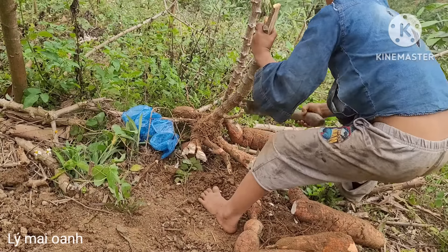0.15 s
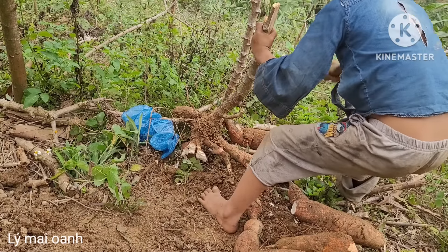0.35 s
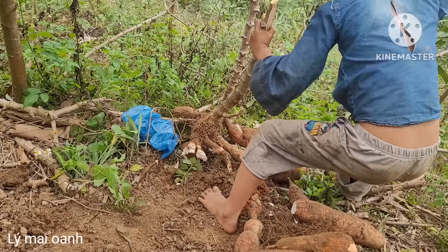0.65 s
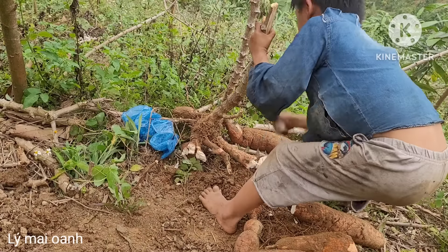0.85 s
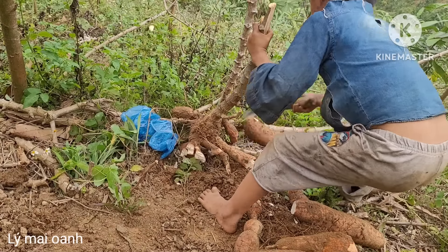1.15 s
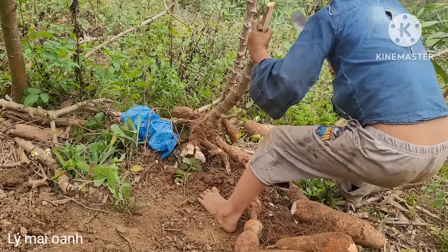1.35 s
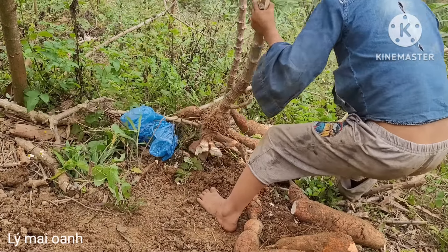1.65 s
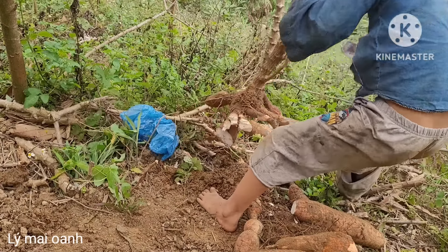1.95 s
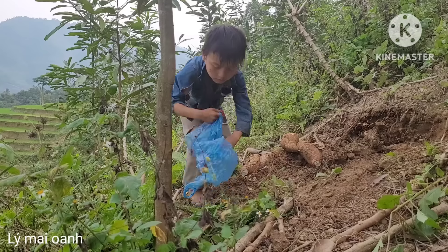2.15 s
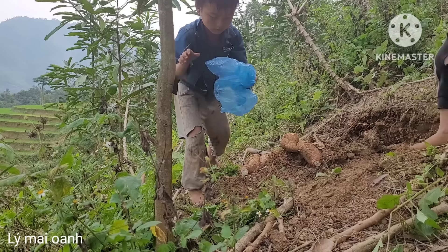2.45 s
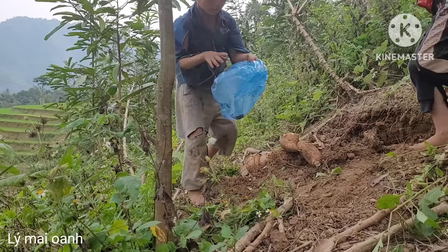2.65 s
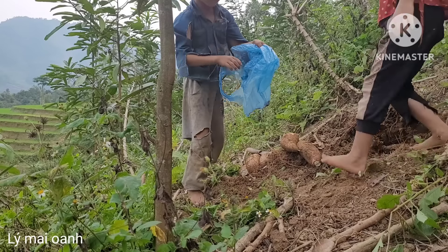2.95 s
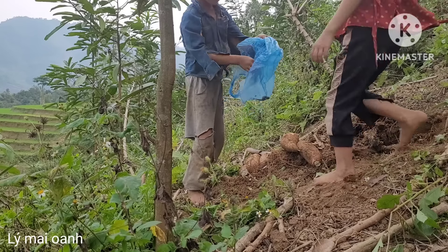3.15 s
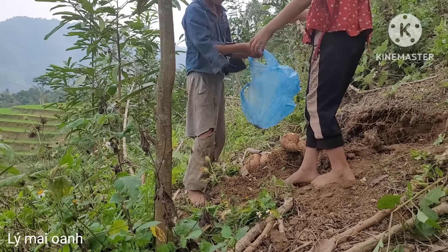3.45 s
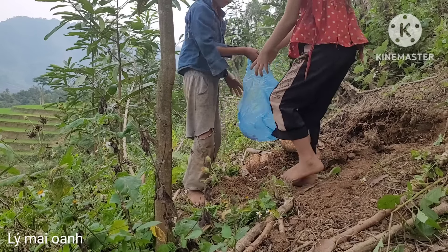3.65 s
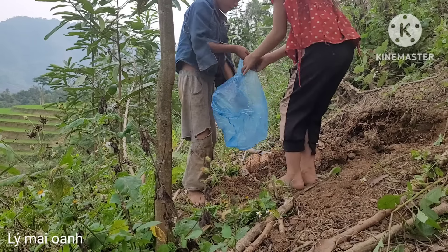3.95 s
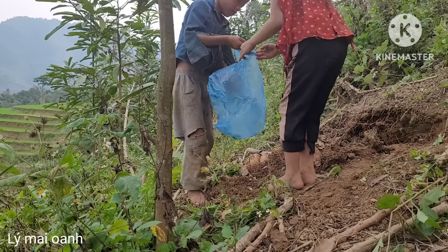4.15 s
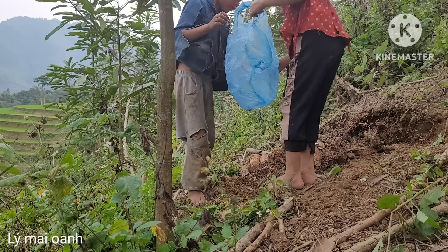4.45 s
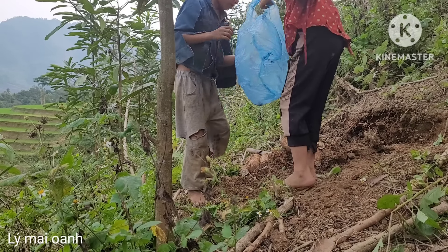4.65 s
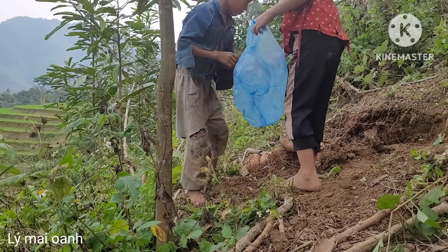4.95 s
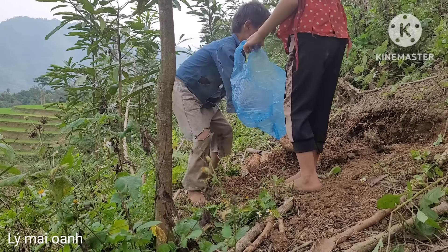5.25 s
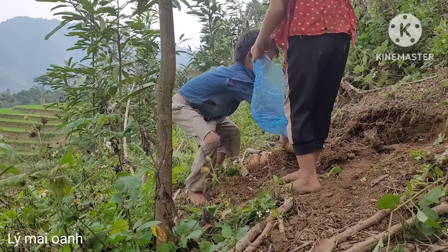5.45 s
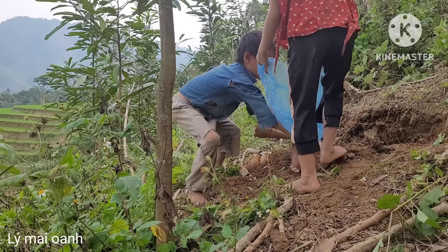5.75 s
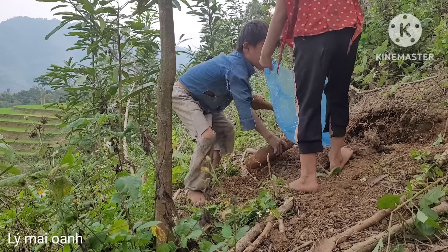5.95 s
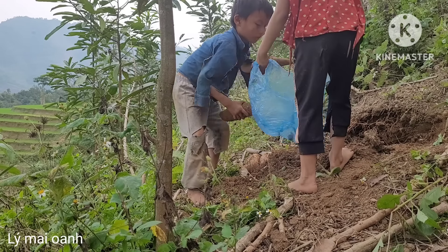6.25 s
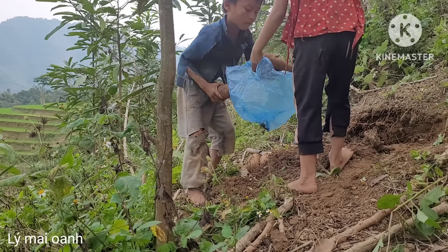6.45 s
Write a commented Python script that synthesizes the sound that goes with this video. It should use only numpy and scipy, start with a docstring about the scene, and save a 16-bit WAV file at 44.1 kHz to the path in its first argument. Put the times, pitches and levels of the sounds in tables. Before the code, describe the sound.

Quiet open air on a hillside, with a faint dying rustle at 0 s, high cricket chirps about six or seven times a second and weak distant bird piping. At 0.94 s one very loud blade blow bites into a woody root: a sharp crack with splitting fibres, a short hollow ring, a low thud and a brief outdoor echo. From 1.0 to 2.1 s roots scrape through gritty soil in tugs, crumbs trickle, and dry snaps pop, strongest at 1.3 s. Around 2.12-2.24 s almost everything vanishes. Then brighter air returns with crickets, and a thin plastic bag rustles briskly, with soft foot bumps and litter scuffs until about 3 s. Crinkling continues in bursts to 4.4 s, with pops at 2.5 and 3.4 s, then thins, with stirs near 5 s and 6.2-6.6 s. Far birds hoot, coo and call softly, clearest near 4 s.

```python
"""One machete blow cuts a cassava root with noise bursts and damped modes; pulled roots scrape with soil grains.
After a brief near-silence a thin plastic bag rustles as grains and friction noise, and feet shift on the earth
as soft swells of noise. Crickets chirp in both places as sagging tones with a scattered tail, far birds pipe,
hoot and coo as sliding sines, and filtered noise makes the open air."""
import sys
import numpy as np
from scipy import signal
from scipy.fft import rfft, irfft, next_fast_len
from scipy.io import wavfile
from scipy.ndimage import map_coordinates

SR = 44100
rng = np.random.default_rng(int(sys.argv[2]) if len(sys.argv) > 2 else 0)


def waveform_to_disk(signal):
    """Save audio, clipped to [-1, 1], as 16-bit WAV at the path in sys.argv[1]."""
    frames = np.transpose(np.atleast_2d(signal))
    scaled = np.clip(frames, -1, 1) * 32767
    samples = np.round(scaled).astype(np.int16)
    wavfile.write(sys.argv[1], SR, samples)


N = 290619
SLOPE_START_S = 2.2  # the setting passes from the cassava plant to the slope

# Spectrum of the finest crackle of soil and film. Each row: frequency in Hz, relative level in dB.
CRISP_SPECTRUM = [(3500, -27.5), (6500, -5.5), (8500, 1), (11000, 1), (15500, -1)]


def amp(db):
    """A level in decibels is twenty times the logarithm of an amplitude ratio; this inverts it."""
    return 10 ** (np.asarray(db) / 20)


def unit(x):
    """Normalisation by the root mean square gives every signal the same power, 1."""
    return x / np.sqrt(np.mean(x ** 2) + 1e-20)


def clock():
    """Sampling at equal intervals: the time of each sample in seconds."""
    return np.arange(N) / SR


def wobble(rate):
    """Slow random modulation: a smooth curve through normal random knots, rate knots a second."""
    knots = rng.standard_normal(int(N * rate / SR) + 4)
    return map_coordinates(knots, [clock() * rate])


def colour(x, points):
    """Minimum-phase filtering: a causal response of power gain 1 shaped by (Hz, dB) points."""
    size = 8192
    f, db = np.transpose(points)
    log_hz = np.log(np.fft.rfftfreq(size, 1 / SR) + 1)
    gain = unit(amp(np.interp(log_hz, np.log(f), db)))
    # folding the cepstrum onto positive time makes the response causal
    cepstrum = irfft(np.log(np.maximum(gain, 1e-6)))
    cepstrum[1:size // 2] *= 2
    cepstrum[size // 2 + 1:] = 0
    response = irfft(np.exp(rfft(cepstrum)))
    return signal.fftconvolve(x, response[None], axes=1)[:, :N]


def shaped(x, gain):
    """Zero-phase filtering: the spectrum is multiplied by a gain that depends on frequency."""
    size = next_fast_len(N + SR // 2)
    hz = np.fft.rfftfreq(size, 1 / SR)
    return irfft(rfft(x, size) * gain(hz), size)[:, :N]


def spread(pair, side_db):
    """Middle-side stereo: the side signal is added on the left and subtracted on the right."""
    side = amp(side_db) * pair[1]
    return np.array([pair[0] + side, pair[0] - side])


def noise(side_db):
    """White noise has equal power at all frequencies; here in stereo, with a middle of rms 1."""
    return spread(rng.standard_normal((2, N)), side_db)


def pan(db):
    """Intensity stereo: left and right gains share a level difference equally."""
    return amp(db * np.array([[.5], [-.5]]))


def from_right(x):
    """Frequency-dependent level difference: the left is weaker mostly in the middle band."""
    # Each row: frequency in Hz, left minus right in dB.
    left_right_db = [(300, -0.5), (600, -3.5), (1000, -4), (1500, -9.5), (2400, -7.5), (3500, 2.5),
                     (4600, 4), (7000, -3.5), (10000, 2), (15000, -3.5)]
    f, db = np.transpose(left_right_db)
    return shaped(x, lambda hz: pan(np.interp(np.log(hz + 1), np.log(f), db)))


def decay(s, t60):
    """Exponential damping: an envelope jumps to 1 at s and falls 60 dB in t60 seconds."""
    age = clock() - s
    return (age >= 0) * amp(-60 * np.clip(age / t60, 0, 3))


def swells(rows):
    """Gaussian contact pulses: soft bell-shaped pushes from (s, level dB, width s) rows."""
    return sum(amp(db) * np.exp(-.5 * ((clock() - s) / width) ** 2) for s, db, width in rows)


def crackle(rate, size_db, bed_db, side_db):
    """Poisson micro-fracture: random ticks, a few much larger, modulate noise over a friction bed."""
    sizes_db = size_db * np.minimum(rng.exponential(size=N), 4)
    ticks = (rng.random(N) < rate / SR) * amp(sizes_db)
    # the energy of each tick falls by a factor e in 0.53 ms
    energy = signal.lfilter([1], [1, -np.exp(-1 / (0.00053 * SR))], ticks ** 2)
    envelope = unit(np.sqrt(np.abs(energy)))
    return noise(side_db) * unit(envelope + amp(bed_db))


def pips(rate, size_db, centre_hz, cycles):
    """Granular resonance: each stereo grain rings for a few cycles at a pitch of its own; rms 1."""
    count = int(rate * N / SR)
    when, pitch, size, phase, place = rng.random((count, 5)).T[:, :, None]
    hz = centre_hz * 4 ** (pitch - .5)  # within an octave either way
    k = np.arange(96)
    turns = hz * k / SR
    ringing = np.exp(-turns / cycles) * np.sin(2 * np.pi * (turns + phase))
    grains = amp(-size_db * np.log(0.044 + size)) * ringing
    at = (when * N).astype(int) + k
    sides = [np.bincount(at.ravel(), (grains * share).ravel(), N)[:N] for share in (place, 1 - place)]
    return unit(np.array(sides))


def strokes(rows, span, rest_db, rest_fine_db, attack_s, t60):
    """Power addition: coarse and fine loudness of movements that swell, hold and die over a stir."""
    t = clock()
    stir = amp(rest_db) * (t > span[0]) * (t < span[1])
    power = np.array([stir, stir * amp(rest_fine_db)]) ** 2
    for start, hold, db, fine_db in rows:
        on = slice(*np.searchsorted(t, [start - attack_s, start + attack_s + hold + t60]))
        age = t[on] - start
        rise = .5 + .5 * np.tanh(2 * (2 * age / attack_s - 1))
        fall_db = 60 * np.maximum(age - attack_s - hold, 0) / t60
        move = rise * amp(db - fall_db)
        power[:, on] += np.array([move, move * amp(fine_db)]) ** 2
    return np.sqrt(power)


def notes(calls, blur):
    """Frequency glides: rounded calls slide linearly in pitch, their phase blurred by distance."""
    t, out = clock(), np.zeros(N)
    for start, length, hz, fall_hz, db in calls:
        on = slice(*np.searchsorted(t, [start, start + length]))
        age = t[on] - start
        phase = 2 * np.pi * age * (hz - fall_hz * age / length / 2)
        swell = np.sqrt(2 * np.abs(np.sin(np.pi * age / length)))
        out[on] += amp(db) * swell * np.sin(phase + blur[on])
    return out


def air():
    """Broadband ambience: filtered noise murmurs and hisses, with resonance bands of far insects."""
    # Air at the cassava plant. Each row: frequency in Hz, relative level in dB.
    plant_spectrum = [(15, -32.5), (30, -16), (65, -3.5), (100, -2.5), (150, -8.5), (220, -14.5),
                      (400, -16.5), (590, -12), (800, -16.5), (1200, -19.5), (1700, -14.5), (2400, -23.5),
                      (4000, -29.5), (7000, -39), (10000, -56)]
    # Air on the slope. Each row: frequency in Hz, relative level in dB.
    slope_spectrum = [(15, -41), (30, -11.5), (75, -2.5), (120, -6.5), (190, -12), (420, -12.5), (600, -13),
                      (850, -18), (1500, -24.5), (2200, -45), (3100, -15.5), (3900, -18), (7000, -15.5),
                      (10000, -27)]
    # Distant insects. Each row: centre in Hz, bandwidth in Hz, level in dB.
    insect_bands = [(4560, 380, -87), (7100, 380, -85), (7680, 200, -83)]
    at_plant = amp(-78.5) * from_right(colour(noise(side_db=-5.0), plant_spectrum))
    on_slope = amp(-75.0) * colour(noise(side_db=-5.5), slope_spectrum)
    murmur = np.where(clock() < SLOPE_START_S, at_plant, on_slope) * amp(.8 * wobble(3.4))
    hiss_spectrum = [(1000, -14.5), (5000, -0.5), (9000, -5.0), (15500, -6)]
    hiss = amp(-81.0) * colour(noise(side_db=2), hiss_spectrum)

    def band_gain(f):
        """Resonance curves: each band peaks at its centre and falls off on both sides."""
        return sum(amp(db) * unit(1 / (1 + (2 * (f - hz) / width) ** 2)) for hz, width, db in insect_bands)

    insects = shaped(noise(side_db=1), band_gain) * amp(2.4 * wobble(22.0))
    return murmur + hiss + insects


def roots():
    """Granular friction: after a dying rustle, roots scrape through soil, rootlets tick, crumbs fall."""
    # A dying rustle at the start, then tugs on the roots. Each row: start in seconds,
    # hold in seconds, scrape level in dB, crumbs over scrape in dB.
    drag_rows = [(-.05, 0.0025, -66.5, -2), (.95, 0.014, -57.5, -2.5), (1.02, 0.025, -65.5, 2),
                 (1.1, 0.063, -67.5, -0.5), (1.255, 0.031, -59.5, 2.5), (1.39, .03, -73, -8),
                 (1.578, .05, -63, 0), (1.665, 0.041, -59.5, -1.5), (1.785, 0.058, -60, -2.5),
                 (1.89, 0.015, -70.5, 2)]
    # Scraped soil. Each row: frequency in Hz, relative level in dB.
    soil_spectrum = [(60, -21.5), (250, -4.5), (400, -13), (750, -2.5), (1200, -9), (1890, -1.5),
                     (2600, -2.5), (3300, -7), (4200, 1.5), (7000, -1), (9100, -33)]
    # loose soil trickles between tugs; the soil resists each tug, then settles
    drag, crumbs = strokes(drag_rows, span=(1.0, 2.06), rest_db=-74.5, rest_fine_db=-2.5,
                           attack_s=.045, t60=0.43)
    grit = crackle(rate=1900, size_db=1.0, bed_db=0.5, side_db=1.0)
    grit = grit + .7 * pips(rate=990, size_db=-1.5, centre_hz=1800, cycles=1.7)
    scrape = drag * amp(1.5 * wobble(50)) * unit(colour(grit, soil_spectrum))
    fine = crackle(rate=1700, size_db=3.5, bed_db=-0.5, side_db=0.0)
    return scrape + crumbs * colour(fine, CRISP_SPECTRUM)


def crickets():
    """Stridulation: each wing stroke is a short tone sagging in pitch as it ends; leaves scatter it."""
    # Bouts of song. Each row: start in seconds, end in seconds, chirp period in seconds,
    # pulses per chirp, pulse spacing in seconds, base pitch in Hz, relative level in dB,
    # left minus right in dB.
    bouts = [ (0.107, 0.95, .1522, 2, .031, 7790, -60, -7), (1.053, 2.1, .1522, 2, .032, 7770, -60.5, -5),
             (0.015, 2.1, .1515, 2, .034, 7790, -73, -5), (2.392, 6.59, .1524, 2, .032, 7745, -65.5, 3),
             (2.35, 4.4, .1525, 4, .038, 7700, -68, 3), (2.3, 6.59, .1493, 4, .036, 7650, -76, 0),
             (4.47, 6.59, .1524, 4, .0305, 7745, -67, 6)]
    stroke_s, scatter_t60 = .02, .15  # one sweep of the wings; how long the leaves hold a note
    song, t = np.zeros((2, N + SR)), np.arange(SR // 40) / SR
    stroke = np.clip(t / stroke_s, 0, 1)
    for start, end, period, pulses, spacing, hz, db, pan_db in bouts:
        chirps = np.arange(start, end, period)
        centres = np.add.outer(chirps, np.arange(round(pulses)) * spacing).ravel()
        for s, (loud, sharp) in zip(centres, rng.standard_normal((len(centres), 2))):
            pitch = hz + 14 * sharp + 25 - 260 * stroke ** 5
            tone = np.sin(np.pi * stroke) * np.sin(2 * np.pi * np.cumsum(pitch) / SR)
            first = max(round((s - .0115) * SR), 0)
            song[:, first:][:, :len(t)] += amp(db + 2.0 + .5 * loud) * pan(pan_db) * tone
    song = song[:, :N]
    leaves = rng.standard_normal((2, SR // 4)) * decay(0, scatter_t60)[:SR // 4]
    scatter = signal.fftconvolve(song, leaves / np.linalg.norm(leaves[0]), axes=1)[:, :N]
    scatter_gain = np.where(clock() < SLOPE_START_S, amp(-15), amp(-5.5))
    return song + scatter_gain * scatter


def far_birds():
    """Propagation over distance: piping, hoots, coos and slurs waver in phase and level."""
    # A second, higher caller. Each row: start in seconds, length in seconds, relative level in dB.
    coo_rows = [(0, 0.43, -86.5), (0.651, 0.27, -83), (1.451, .6, -83.5), (3.302, .17, -82),
                (3.619, 0.14, -82), (3.9, 0.15, -80), (4.323, .14, -78), (4.58, 0.19, -85.5),
                (5.618, 0.38, -80.5)]
    # Single slurred calls. Each row: start in seconds, length in seconds, start pitch in Hz,
    # fall in Hz (negative rises), relative level in dB.
    slur_rows = [(3.853, .07, 3650, 30, -70), (4.02, .3, 1315, 45.5, -82), (4.11, 0.074, 3690, 40, -71),
                 (4.281, 0.14, 1260, 80, -78.5), (4.31, 0.062, 3090, -130, -73),
                 (4.602, 0.31, 375, 18, -80.5), (4.689, 0.2, 311, -22, -77.5)]
    # calls: start s, length s, start Hz, fall Hz, relative level dB
    piping = [(.24 + k * .38, 0.19, 1622, 18, -84.5) for k in range(4)]
    # the hoots slowly lose pace
    period_s, slowing_s = .337, .004
    hoots = [(2.24 + k * (period_s + k * slowing_s / 2), .18, 323, 7.2, -81.5) for k in range(12)]
    coos = [(start, length, 598, 8, db) for start, length, db in coo_rows]
    calls = [*hoots, *coos, *piping, *slur_rows]
    return notes(calls, blur=.45 * wobble(40)) * amp(2.3 * wobble(28))


def snaps():
    """Brittle fracture: rootlets snap and creases pop as dry cracks, each with a short noise tail."""
    # Each row: time in seconds, relative level in dB.
    snap_rows = [(0.634, -65), (1.2957, -43.5), (1.719, -51), (1.8088, -56), (1.966, -58), (2.0819, -52.5),
                 (2.5043, -47.5), (3.376, -47), (3.9888, -53), (4.081, -56), (4.621, -61.5), (5.0488, -49),
                 (6.2627, -65), (6.2964, -63), (6.5533, -55)]
    blows = sum(amp(db + 3) * decay(s, t60=.005) + amp(db - 7) * decay(s, t60=.035) for s, db in snap_rows)
    return colour(blows * noise(side_db=-3), [(200, -4), (1300, 1), (4000, 2), (9000, 7), (15500, 8.5)])


def chop():
    """Impact and modal damping: fibres split in bursts, root and blade ring, the hillside answers."""
    # The blade grazes, enters, splits the root and drives through. Each row: time in seconds,
    # relative level in dB, 60 dB decay in seconds.
    cut_bursts = [(0.9275, -60, .02), (0.9408, -28, .03), (0.9423, -19, .012), (0.943, -24, .045),
                  (0.9458, -24, .008), (0.949, -28, .02), (0.9516, -22, .008), (0.955, -35, .12)]
    # The splitting root. Each row: frequency in Hz, relative level in dB.
    wood_spectrum = [(120, -17.5), (250, -8.5), (400, -12), (650, -11), (900, -7.5), (1300, -9.5),
                     (1800, -5.5), (2600, -5), (3280, -12), (3900, -5), (5200, -8.5), (6300, -3),
                     (9500, -7), (15500, -10.5)]
    # Modes of root, stem and blade. Each row: frequency in Hz, level in dB, 60 dB decay in seconds.
    modes = [(118, -37, 0.13), (148.15, -28.5, 0.012), (240, -32.5, 0.04), (269.6, -30.5, 0.14),
             (458, -39, .12), (777, -38.5, 0.12), (1080, -23, 0.045), (1740, -24, 0.022),
             (1870, -20, 0.026), (1843, -29, 0.06), (2120, -36.5, .045), (2630, -35.5, 0.11),
             (2900, -28.5, .05), (4660, -37, 0.057)]
    strike = .9423  # the edge cracks the root (s)
    shove = strike + .005  # the heavy stem moves only once the blade has bitten in

    bursts = sum(amp(db) * decay(s, t60) for s, db, t60 in cut_bursts)
    click = signal.unit_impulse((1, N), (0, round(strike * SR)))
    edge = colour(click, [(150, -15), (1500, 2), (3300, -8), (7000, 0), (11000, -9), (15500, -20)])
    fibres = colour(bursts * noise(side_db=-2.5), wood_spectrum)
    split = amp(-0.36) * fibres + amp(-7.5) * edge

    ring, rough = np.zeros(N), 0.32 * wobble(120)
    for hz, db, t60 in modes:
        start = shove if hz < 400 else strike
        age = np.maximum(clock() - start, 0)
        swell = 1 - np.exp(-age * hz / 1.1)  # each mode builds up in about one cycle
        ring += amp(db) * swell * decay(start, t60) * np.sin(2 * np.pi * hz * age + rough)

    thud_spectrum = [(35, -30.5), (70, -3), (130, -0.5), (200, -5.5), (290, -1.0), (600, -10), (1500, -38.5)]
    thud = colour(noise(side_db=-22.5) * amp(-35.5) * decay(shove, t60=.13), thud_spectrum)
    echo = colour(noise(side_db=-0.5) * amp(-46.5) * decay(shove, t60=0.29), wood_spectrum)
    return split + ring + thud + echo


def bumps():
    """Heavily damped contact: loose earth and dry litter swell and fade without ringing."""
    # Roots and feet on the earth. Each row: centre in seconds, level in dB, width in seconds.
    bump_rows = [(1.333, -62.5, 0.022), (2.321, -68, 0.12), (2.714, -68, 0.055), (3.01, -72, 0.017),
                 (3.358, -77, 0.041), (3.97, -82, .05), (6.3, -77.5, 0.093)]
    # Each row: frequency in Hz, relative level in dB.
    earth_spectrum = [(35, -46), (70, 0.5), (140, -14), (300, -2.5), (800, -5), (1600, -16.5)]
    # Litter scuffed by feet and a lifted root. Each row: centre in seconds, level in dB,
    # width in seconds.
    scuff_rows = [(2.315, -60.5, 0.053), (2.41, -60.5, .02), (3.96, -67.5, 0.027), (6.33, -66.5, 0.028),
                  (6.47, -68.5, 0.07), (6.56, -64.5, 0.019)]
    # Each row: frequency in Hz, relative level in dB.
    litter_spectrum = [(200, -18), (700, -14), (1200, -3.5), (1700, 0), (2600, -6.5), (5000, -17),
                       (10000, -12)]
    earth = colour(swells(bump_rows) * noise(side_db=-16), [*earth_spectrum, (5000, -47)])
    scuff = swells(scuff_rows) * crackle(rate=300, size_db=4.0, bed_db=6, side_db=-15)
    return earth + colour(scuff, litter_spectrum)


def bag():
    """Buckling of a thin film: it rustles as it flexes, and small creases flip in dense swarms."""
    # The bag is shaken, opened, passed over, lifted and filled. Each row: start in seconds,
    # hold in seconds, rustle level in dB, crinkle over rustle in dB.
    flex_rows = [(2.24, 0.049, -59, 3), (2.362, 0.015, -59, 2.5), (2.475, 0.028, -68, 3),
                 (2.59, 0.035, -67.5, 3), (2.655, 0.077, -63, 2.5), (2.96, 0.0072, -72.5, 12),
                 (3.095, 0.32, -66, 0), (3.49, 0.021, -63, 2.5), (3.58, 0.066, -71, 2),
                 (3.85, 0.087, -61.5, 0), (3.99, 0.082, -68.5, 3.5), (4.13, 0.11, -69.5, 2.5),
                 (4.28, .1, -74.5, 2), (4.66, 0.0095, -87.5, 11.5), (4.815, 0.022, -79, 11),
                 (4.975, 0.065, -65, 0.5), (5.15, .01, -79.5, 5), (5.265, 0.021, -73.5, 5),
                 (5.415, .04, -73.5, 4), (5.835, .015, -82, 7.5), (5.99, 0.055, -76.5, 3.5),
                 (6.155, 0.17, -69.5, -0.5), (6.385, 0.083, -68, 0.5), (6.515, 0.009, -63.5, -2)]
    # The plastic film. Each row: frequency in Hz, relative level in dB.
    film_spectrum = [(100, -29.5), (300, -3), (480, -15.5), (750, -5), (1200, -3), (1700, -6.5),
                     (2400, -5.5), (3400, -0.5), (5000, -1.5), (7000, -1.5), (9100, -17.5)]
    # the film tightens, then relaxes; it stirs faintly between flexes
    rustle, crinkle = strokes(flex_rows, span=(2.25, 6.59), rest_db=-80, rest_fine_db=0.5,
                              attack_s=0.043, t60=0.4)
    flutter = amp(0.89 * wobble(45))
    rustle = rustle * amp(0.59 * wobble(25))
    crinkle = crinkle * amp(.7 * wobble(60))
    folds = crackle(rate=1000, size_db=2.0, bed_db=5, side_db=-2.5)
    folds = folds + .7 * pips(rate=1800, size_db=2.5, centre_hz=3085, cycles=2.1)
    creases = crackle(rate=700, size_db=1.5, bed_db=2.0, side_db=1.0)
    creases = creases + .5 * pips(rate=1300, size_db=4.5, centre_hz=8040, cycles=1.6)
    return flutter * (rustle * colour(folds, film_spectrum) + crinkle * colour(creases, CRISP_SPECTRUM))


def scene():
    """Superposition: the pressures of all sources in the field add."""
    cassava = from_right(chop() + roots())
    return air() + cassava + crickets() + far_birds() + snaps() + bumps() + bag()


def record(dry):
    """Gain and band limiting: the level drops to near-silence and returns; a steep low-pass acts."""
    # Each row: time in seconds, gain in dB.
    fade_points = [(0, 0), (1.99, 0), (2.06, -4), (2.11, -12), (2.125, -70), (2.235, -70), (2.256, 0),
                   (6.59, 0)]
    top_hz = 15750
    s, db = np.transpose(fade_points)
    faded = dry * amp(np.interp(clock(), s, db))
    return shaped(faded, lambda hz: 1 / (1 + (hz / top_hz) ** 120))


dry = scene()
out = record(dry)
waveform_to_disk(out)
```